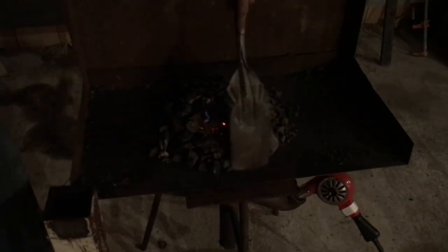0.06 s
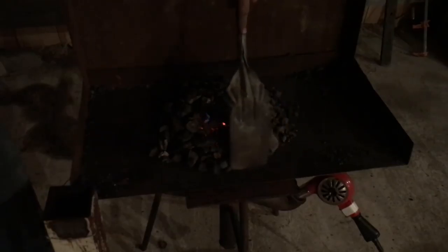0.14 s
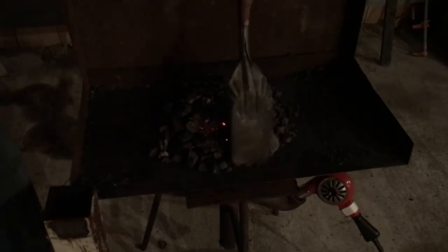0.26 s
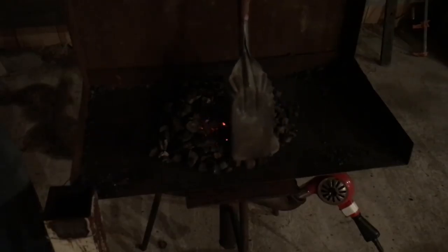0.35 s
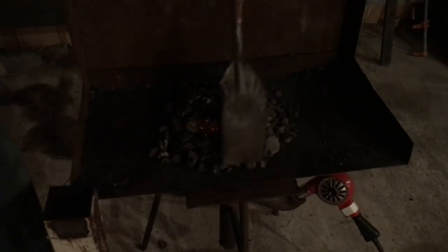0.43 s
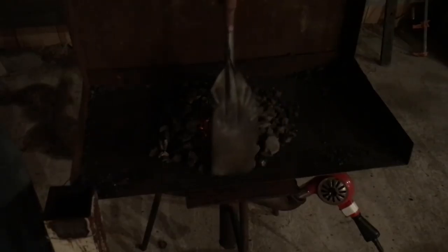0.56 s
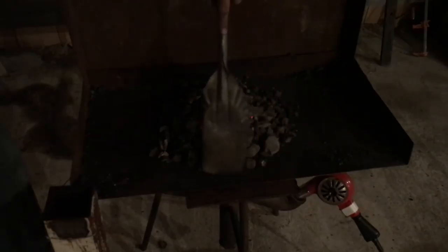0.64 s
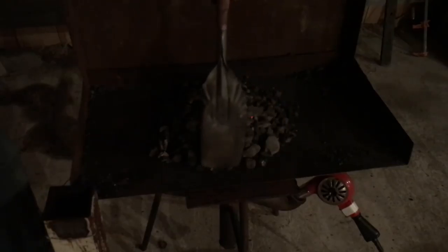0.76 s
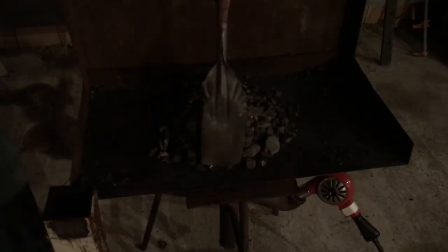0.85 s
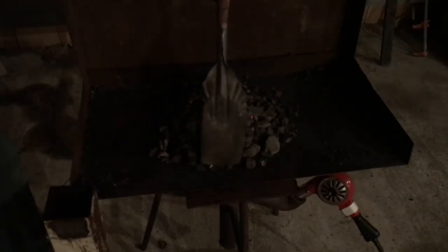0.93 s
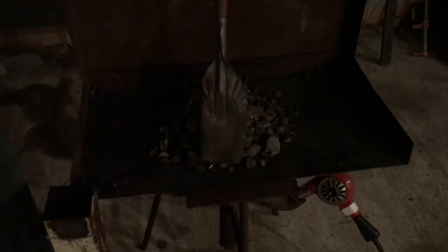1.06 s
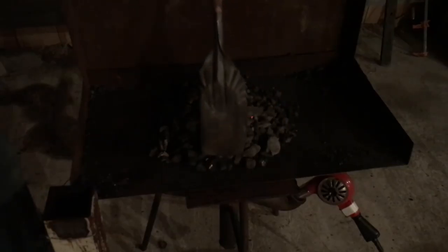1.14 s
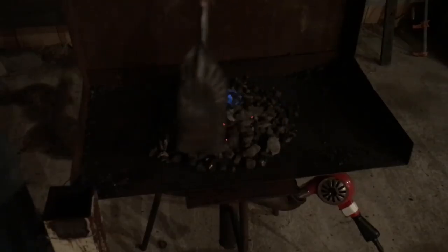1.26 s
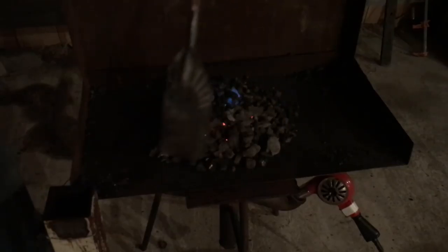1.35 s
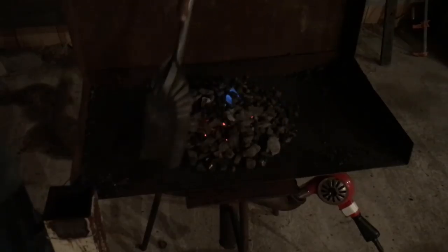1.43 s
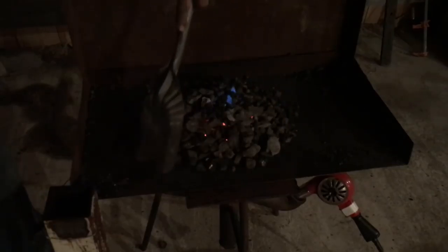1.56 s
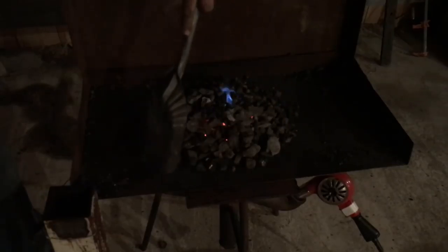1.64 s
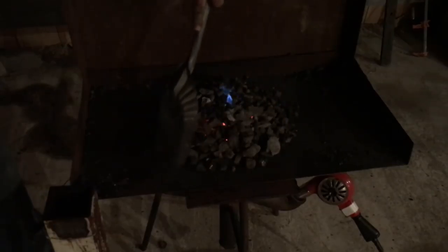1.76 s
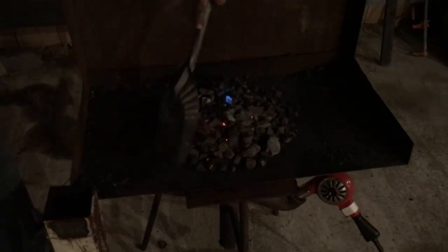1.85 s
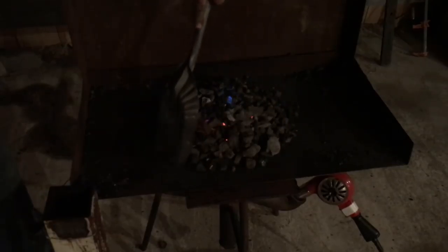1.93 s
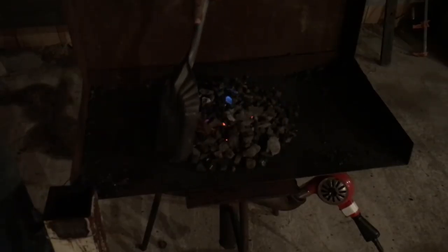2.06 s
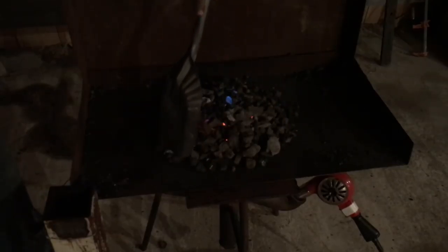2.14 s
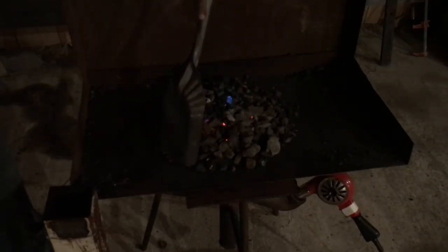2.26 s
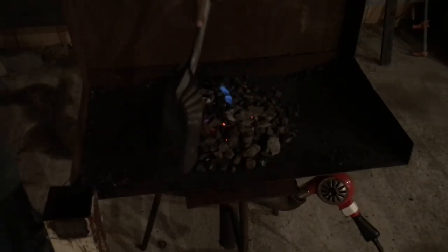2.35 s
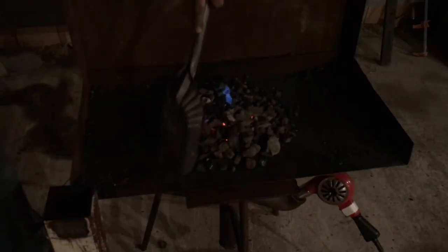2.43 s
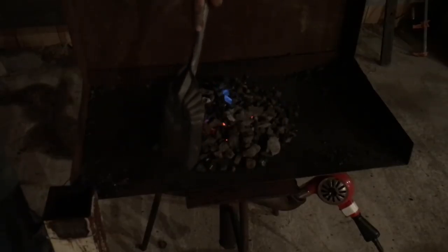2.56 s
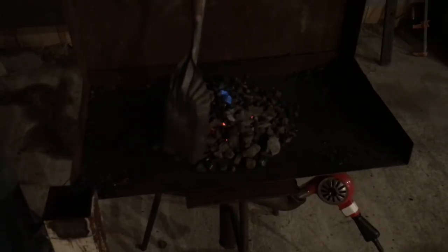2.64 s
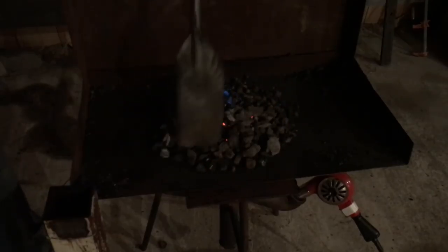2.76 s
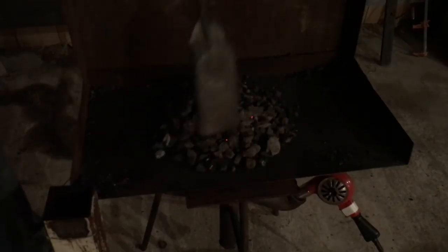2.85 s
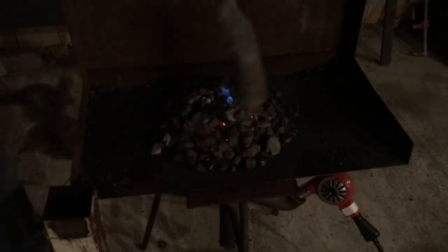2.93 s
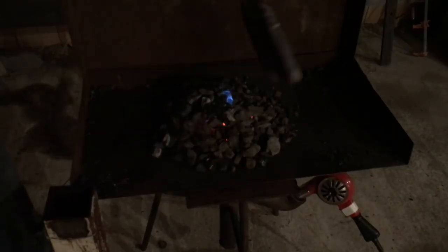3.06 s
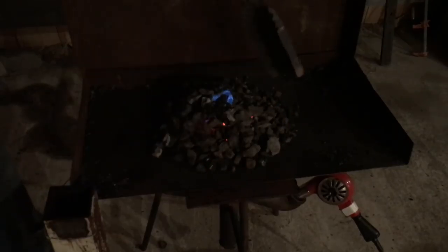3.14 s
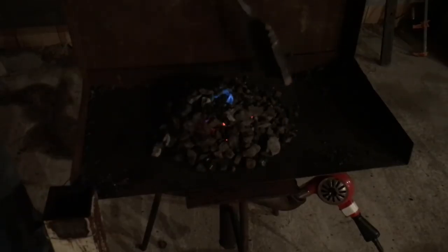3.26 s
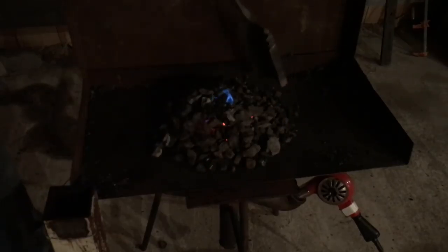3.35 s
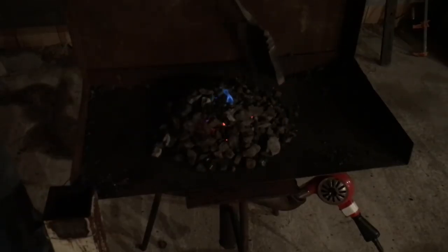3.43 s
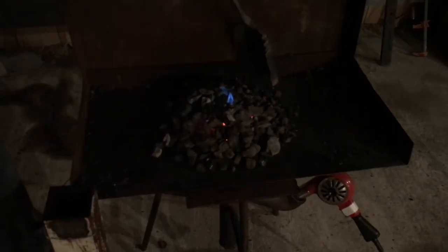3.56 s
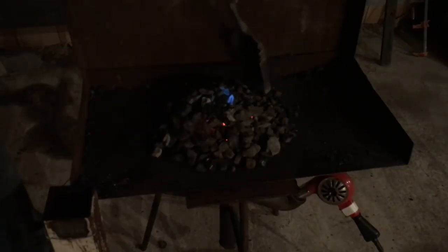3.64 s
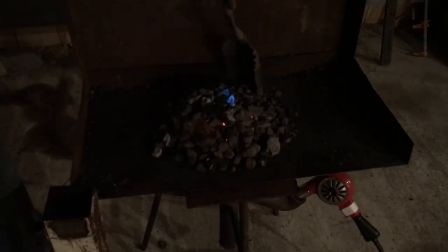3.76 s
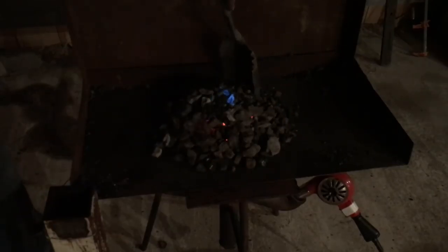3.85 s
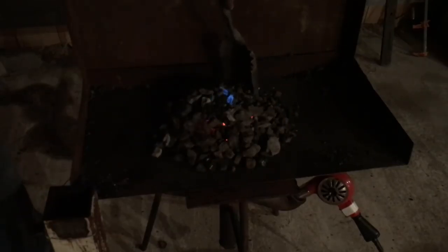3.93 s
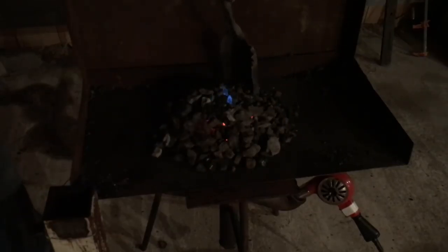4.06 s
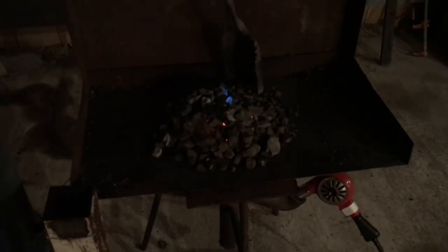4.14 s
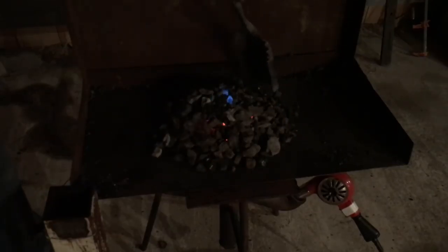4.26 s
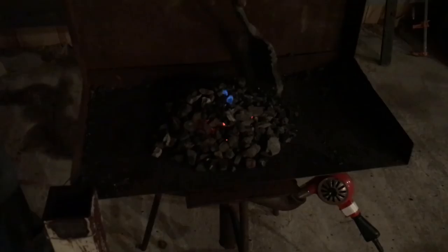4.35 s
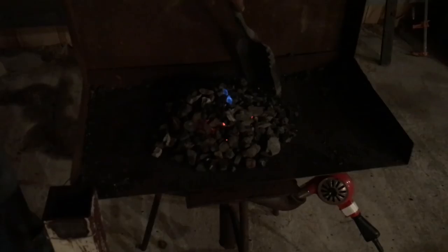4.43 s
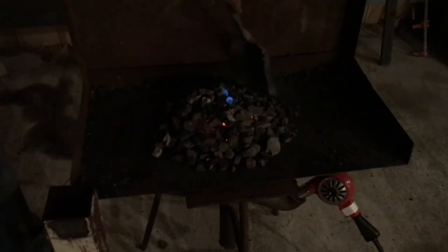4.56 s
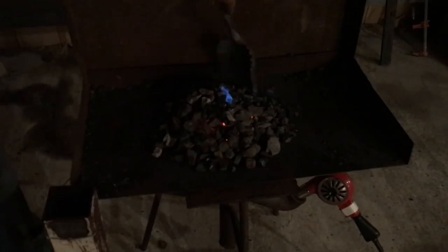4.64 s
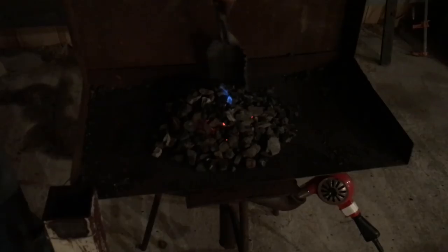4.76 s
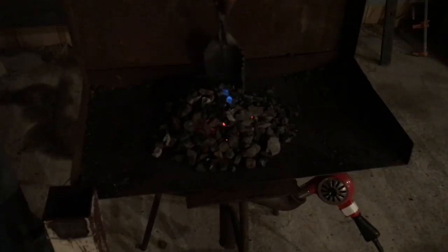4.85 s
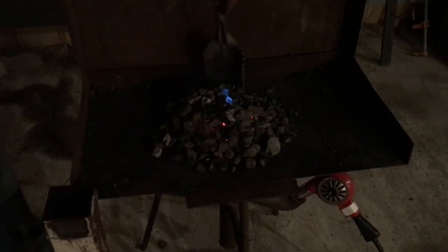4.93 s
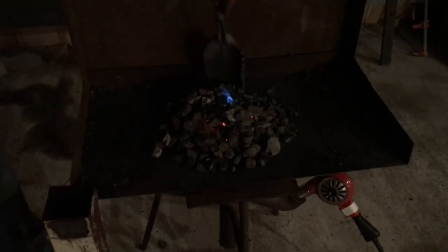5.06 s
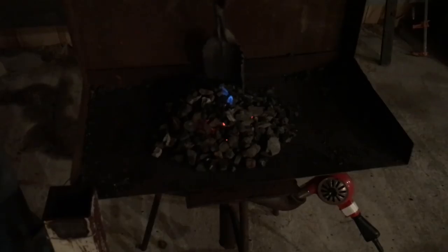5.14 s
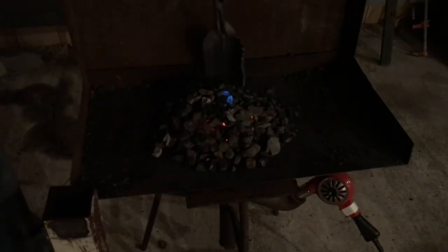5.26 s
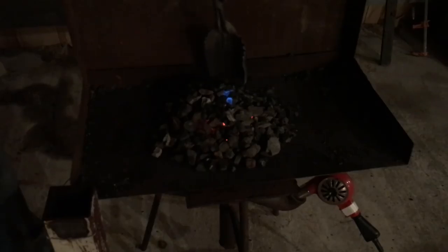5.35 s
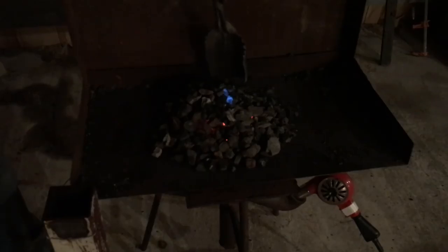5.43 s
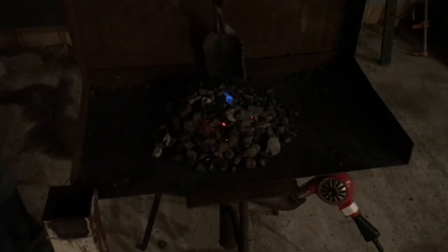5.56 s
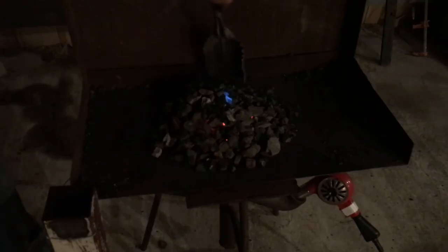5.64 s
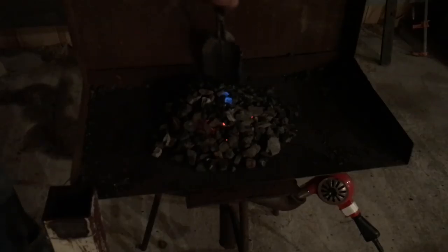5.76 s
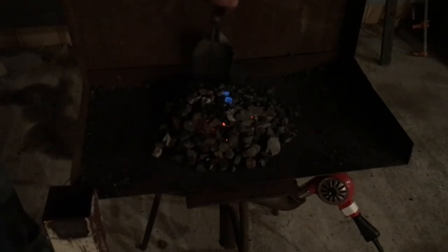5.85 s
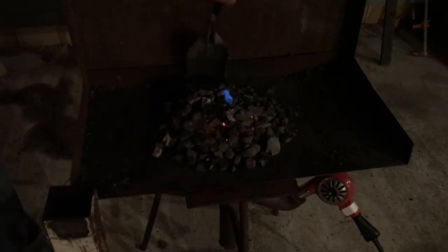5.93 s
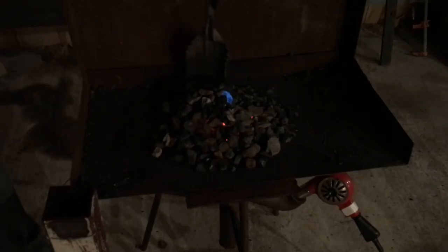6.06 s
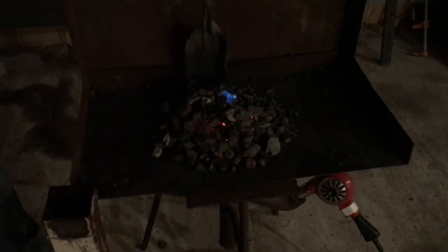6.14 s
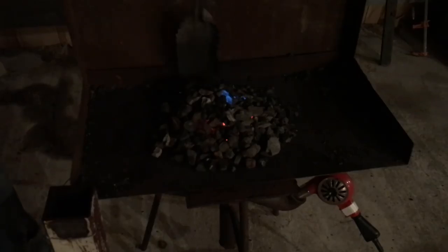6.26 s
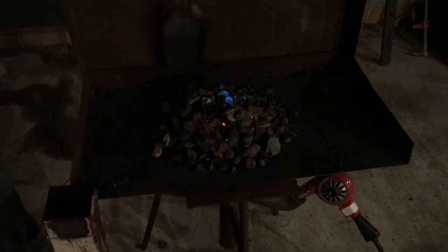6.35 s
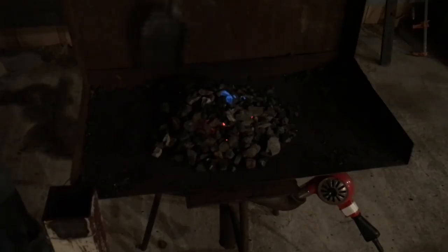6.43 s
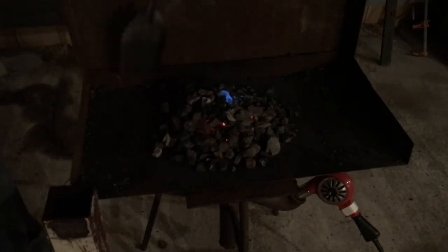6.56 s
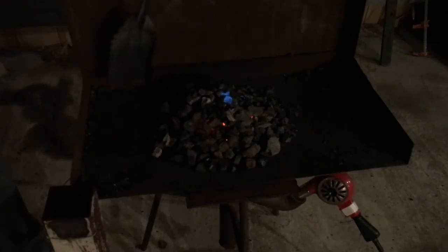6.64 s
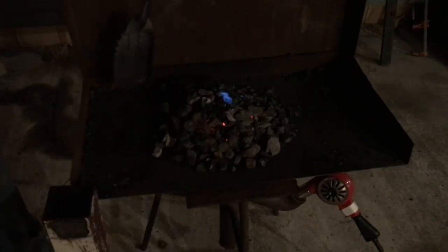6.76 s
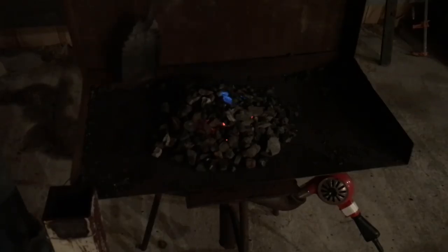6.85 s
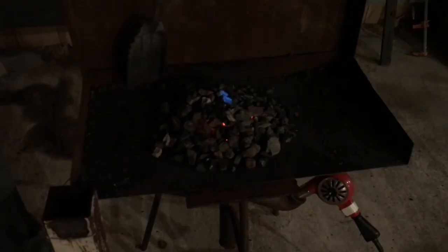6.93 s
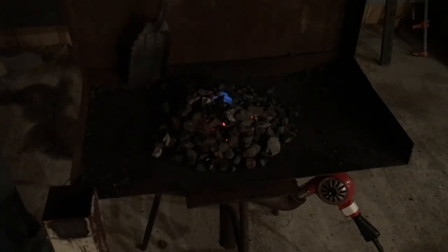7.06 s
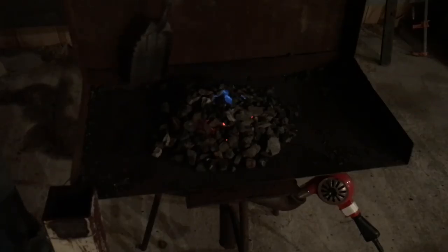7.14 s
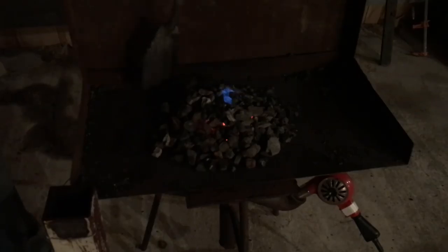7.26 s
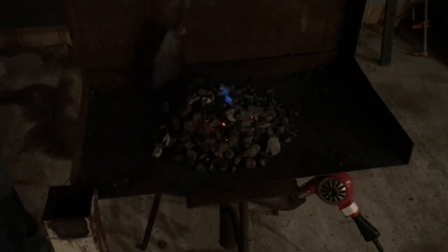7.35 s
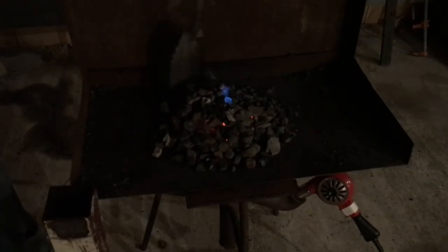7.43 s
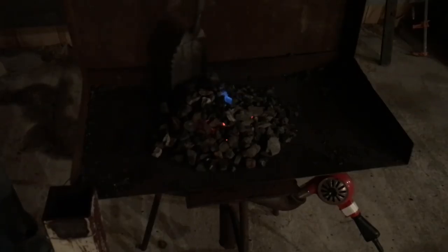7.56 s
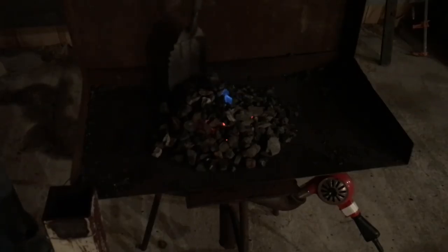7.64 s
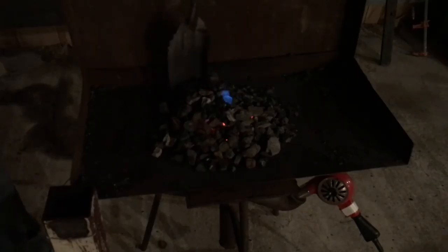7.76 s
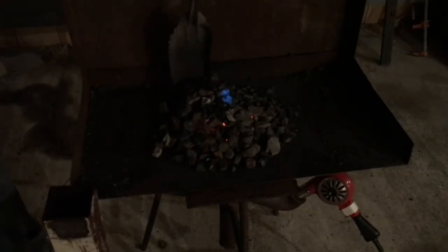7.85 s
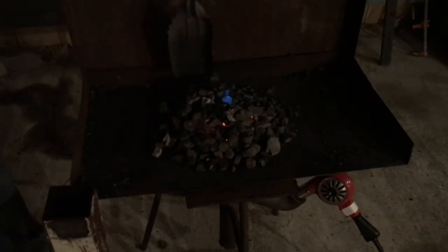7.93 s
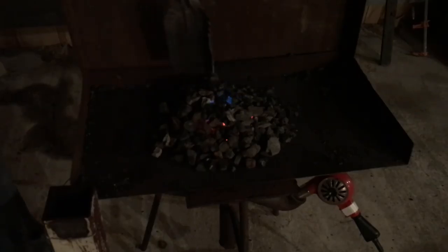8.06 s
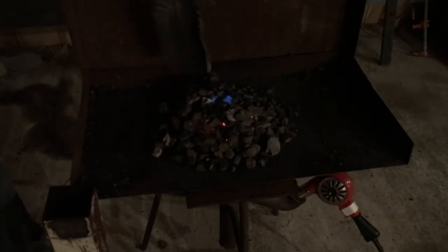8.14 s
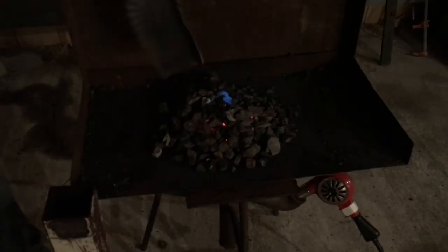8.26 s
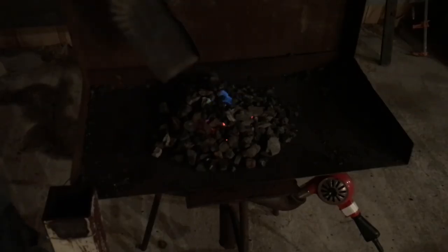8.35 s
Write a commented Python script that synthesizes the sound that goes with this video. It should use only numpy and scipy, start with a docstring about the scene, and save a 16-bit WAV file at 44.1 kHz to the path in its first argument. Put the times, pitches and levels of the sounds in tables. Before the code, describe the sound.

A small steel shovel scrapes and jabs gritty coal into a heap on a sheet-metal forge pan, with clanks, tumbling lumps and sharp fire snaps.

```python
"""Shovelling coal at the forge

A small steel shovel, close to the microphone, pushes coal into a heap on the forge's sheet-steel pan.
Strokes and blows crush random grit that drives the modes of blade, pan and stand; the free blade also rings.
Lumps tumble and coal snaps as short noise bursts, and butts against the pan give low thumps.
The workshop adds a faint low rumble of filtered noise and a short echo of dense reflections."""
import sys
import numpy as np
from scipy import signal
from scipy.io import wavfile
from scipy.ndimage import uniform_filter1d

SR = 44100
rng = np.random.default_rng(int(sys.argv[2]) if len(sys.argv) > 2 else 0)


def to_wav(sig):
    """Store sig (one row per channel, or 1-D mono) as 16-bit WAV at the path in sys.argv[1].

    Samples outside -1..1 are clipped; the rate is SR.
    """
    pcm = np.clip(np.atleast_2d(sig), -1, 1) * 32767
    pcm = np.round(pcm).astype(np.int16)
    wavfile.write(sys.argv[1], SR, pcm.T)  # frames by channels


N = 370440
TIME = np.arange(N) / SR

# The blade lands or jams. Each row: start in seconds, then levels before trim of clash in dB,
# sizzle in dB and pan boom in dB, and decay time constant in seconds.
BLADE_BLOWS = [(0, -26, -43, -30.5, 0.012), (0.569, -20.5, -27, -25.5, 0.016),
               (0.735, -25, -19, -36, 0.016), (0.751, -26, -20, -27.5, 0.0045),
               (0.852, -38, -42, -41, 0.0055), (1.675, -43.5, -47, -41, 0.039),
               (1.69, -26.5, -31.5, -26.5, 0.013), (1.819, -27, -21.5, -41, 0.015),
               (2.508, -19.5, -36, -23.5, 0.0094), (3.6, -36.5, -74, -34.5, 0.021),
               (3.639, -29, -26, -28, 0.028), (3.732, -26.5, -28.5, -31.5, 0.029),
               (4.488, -25, -17.5, -21, 0.011), (4.857, -14.5, -41, -39, 0.0017),
               (5.572, -35, -48, -40.5, 0.0059), (5.702, -47.5, -19.5, -26.5, 0.006),
               (6.248, -26, -42, -42, 0.0053), (6.941, -21.5, -54, -23, 0.018),
               (6.969, -30, -26, -26.5, 0.01), (7.48, -28, -22, -43.5, 0.011),
               (7.513, -19, -19, -40.5, 0.014)]
# Modes of the free blade, twisting and bending by turns.
# Each row: frequency in Hz, relative level in dB, undamped t60 in seconds.
BLADE_MODES = [(1003, -5, .3), (1076, 1, .8), (1205, -6, .17), (1480, -8, .13), (1640, -3, .38),
               (1946, -11, .55), (2197, -4, .3), (2975, -5, .13), (3230, -10, .14), (3390, -4, .18),
               (3975, -6.5, .38), (4540, -12, .06), (5450, -12, .2), (6500, -14, .14), (7720, -18, .12),
               (9620, -22, .25)]
# Spectrum of a coal snap. Each row: frequency in Hz, relative level in dB per Hz.
SNAP_SPECTRUM = [(200, -20.5), (1500, -12), (4000, -6), (7000, 0), (12000, 3), (16000, -2)]
# Spectrum of a knocking lump. Each row: frequency in Hz, relative level in dB per Hz.
KNOCK_SPECTRUM = [(80, -24.5), (450, -8), (770, 0), (1200, -4.5), (2700, -5.5), (5000, -16.5),
                  (16000, -24.5)]


def amp(db):
    """Turns dB into an amplitude factor."""
    return 10 ** (np.asarray(db) / 20)


def unit(x):
    """Scales to an energy of one."""
    return x / np.sqrt(np.sum(x ** 2) + 1e-20)


def read(points, hz):
    """Reads a table on a log-frequency axis."""
    f, value = np.transpose(points)
    return np.interp(np.log(hz + 1), np.log(f + 1), value)


def along(rows):
    """Joins the rows of a curve by straight lines, one signal a column."""
    s, *columns = np.transpose(rows)
    return [np.interp(TIME, s, column) for column in columns]


def add(mix, s, sound):
    """Mixes a sound in at time s."""
    part = mix[max(round(s * SR), 0):][:len(sound)]
    part += sound[:len(part)]


def through(x, response):
    """Sends a force or sound through an impulse response."""
    return signal.oaconvolve(x, response)[:N]


def colour(points, size=2048):
    """Causal minimum-phase impulse response with the given spectrum and an energy of one."""
    log_gain = np.log(amp(read(points, abs(np.fft.fftfreq(size, 1 / SR)))))
    spectrum = np.exp(np.conj(signal.hilbert(log_gain)))
    return unit(np.fft.ifft(spectrum).real)


def body(modes, damping_db_s=0):
    """Impulse response of a set of dying modes; contact adds damping."""
    t = TIME[:SR]
    response = np.zeros(SR)
    for k, (hz, db, t60) in enumerate(modes):
        decay = amp(-t * (60 / t60 + damping_db_s))
        response += amp(db) * unit(decay * np.cos(2 * np.pi * (hz * t + k / 4)))
    return unit(response)


def bursts(rows, length, spectrum):
    """Each row (start in s, peak in dB) is one fracture or impact: coloured noise dying away in length s."""
    out, t, response = np.zeros(N), TIME[:2048], colour(spectrum)
    for s, db in rows:
        dying_noise = rng.standard_normal(len(t)) * np.exp(-t / length)
        burst = signal.fftconvolve(dying_noise, response)
        add(out, s, amp(db) * burst / abs(burst).max())
    return out


def workshop_air():
    """The faint low rumble of the workshop: steady noise with a fixed spectrum."""
    # Each row: frequency in Hz, relative level in dB per Hz.
    air_spectrum = [(20, -22), (58, 14.5), (80, -3), (170, 6), (1000, -24), (16000, -36.5)]
    return amp(-61.5) * through(rng.standard_normal(N), colour(air_spectrum))


def room(x):
    """A tail of dense reflections that builds up quickly, each band dying at its own speed."""
    # Reverberation of the workshop. Each row: frequency in Hz, t60 in seconds.
    room_t60 = [(200, 1.0), (800, 0.7), (5000, 0.31), (15000, 0.1)]
    taps = rng.standard_normal(SR) * (1 - np.exp(-TIME[:SR] / 0.0054))
    hz, t, bands = signal.stft(taps, SR, nperseg=256)
    decay = amp(-60 * t / read(room_t60, hz)[:, None])
    tail = signal.istft(bands * decay, SR, nperseg=256)[1]
    return through(x, unit(tail))


def crackle(per_s, db):
    """Small random ticks of the fire and of settling crumbs; a few stand out by up to 20 dB."""
    draws = rng.random((int(per_s * N / SR), 2))
    ticks = [(u * N / SR, db + 20 * v ** 4) for u, v in draws]
    return bursts(ticks, 0.00022, SNAP_SPECTRUM)


def coal_snaps():
    """Coal in the fire fractures with sharp snaps: noise bursts under a millisecond long."""
    # Each row: start in seconds, peak in dB.
    snap_times = [(1.257, -17.5), (1.4227, -13.5), (1.6298, -28), (2.2975, -35), (2.4112, -8),
                  (3.1397, -20), (3.275, -27), (3.4169, -4), (3.5756, -4.5), (3.8355, -13), (3.979, -12.5),
                  (4.1283, -20.5), (4.2003, -20.5), (4.2444, -22.5), (5.7026, -6), (5.7588, -18),
                  (5.7808, -12)]
    return bursts(snap_times, .0008, SNAP_SPECTRUM)


def lump_knocks():
    """Single lumps tumble and knock, each a duller burst of several milliseconds."""
    # Each row: start in seconds, peak in dB.
    knock_times = [(0.373, -23), (0.422, -27.5), (0.536, -29), (1.102, -29.5), (1.229, -38), (2.831, -23),
                   (2.881, -19), (2.907, -27), (2.962, -32), (2.986, -32), (3.242, -36), (4.423, -34),
                   (5.494, -28.5), (6.334, -35), (8.146, -19.5), (8.225, -21)]
    return bursts(knock_times, .008, KNOCK_SPECTRUM)


def tumble(push_db, per_s, db, most_db):
    """Small lumps roll ahead of the blade, harder when it pushes harder."""
    when, size = rng.random((int(per_s * N / SR), 2)).T
    push_then_db = push_db[(when * N).astype(int)]
    peaks_db = np.minimum(push_then_db + db, most_db) - 10 * size
    return bursts(zip(when * N / SR, peaks_db), 0.0023, KNOCK_SPECTRUM)


def thumps():
    """Loaded with coal, the pan answers a butt of the blade with a few low cycles that swell and die."""
    # Each row: start in seconds, level in dB, pitch in Hz.
    butts = [(.003, -30, 160), (.571, -25, 225), (4.489, -18, 310), (5.705, -24, 330)]
    out, t = np.zeros(N), TIME[:SR]
    thump_s = .010  # time constant of the decay
    for s, db, hz in butts:
        swell = np.sqrt(t / thump_s) * np.exp(1 - t / thump_s)
        add(out, s, amp(db) * swell * np.sin(2 * np.pi * hz * t))
    return out


def singing():
    """Where only its edge touches, the blade rings freely; contact near a corner brings out twisting modes."""
    # The free blade is tapped or chatters. Each row: start in seconds, level in dB before the mode levels,
    # rise in seconds, brightness in dB per octave, twist in dB, extra damping by contact in dB/s.
    taps = [(2.08, -40, .02, -12, 7, 30), (2.152, -22.5, .018, -4, -16, 35), (2.595, -23, .012, -8, 0, 200),
            (4.137, -49, .002, 6, 3, 70), (5.28, -37, .002, -4, 2, 50), (5.572, -35, .004, -7, 2, 80),
            (6.248, -35, .0005, 0, 5, 0), (6.943, -18.5, .004, -8, 2, 350), (7.511, -27, .001, 8, -14, 600),
            (7.79, -44, .004, 3, 1, 90)]
    out, t = np.zeros(N), TIME[:SR]
    for s, ring_db, rise, slope_db, twist_db, damping in taps:
        ring = np.zeros(SR)
        for k, (hz, db, t60) in enumerate(BLADE_MODES):
            twisting = k % 2 == 0
            mode_db = db + slope_db * np.log2(hz / 1000) + twist_db * twisting
            ring += amp(mode_db - 60 * t / t60) * np.sin(2 * np.pi * (hz * t + rng.random()))
        add(out, s, amp(ring_db - damping * t) * ring * (1 - np.exp(-t / rise)))
    return out


def chinks(force):
    """Lumps of many sizes snag on the blade and spring free, each with a short ring at its own pitch."""
    per_s, t60 = 240, .016  # chinks per second, ring time in s
    low, high = 1700, 13000  # range of pitch in Hz
    out, t = np.zeros(N), TIME[:2048]
    when, pitch, size = rng.random((int(per_s * N / SR), 3)).T
    pitches_hz = low * (high / low) ** pitch
    gains = unit(size ** 2) * np.sqrt(N)
    for at, hz, gain in zip((when * N).astype(int), pitches_hz, gains):
        ring = unit(amp(-60 * t / t60) * np.sin(2 * np.pi * hz * t))
        add(out, at / SR, gain * force[at] * ring)
    return out


def grit(per_s, spread_db, dust):
    """Force of crushed grains: clicks of uneven size over a bed of fine dust, rms one."""
    struck = rng.random(N) < per_s / SR
    sizes = amp(spread_db * np.minimum(rng.exponential(1, N), 4))
    clicks = struck * rng.choice([-1, 1], N) * sizes
    return unit(unit(clicks) + dust * unit(rng.standard_normal(N))) * np.sqrt(N)


def wander(x, depth_db, order, size):
    """As the point of contact moves, resonances swell and fade (over `order` frames and `size` bins)."""
    z = signal.stft(x, nperseg=512, noverlap=384)[2]
    patches = uniform_filter1d(rng.standard_normal(z.shape), size, 0)
    patches = uniform_filter1d(patches, order, 1)
    gain = amp(depth_db * patches / patches.std())
    y = signal.istft(z * gain, nperseg=512, noverlap=384)[1][:N]
    return unit(y) * np.sqrt(N)


def judder(depth_db, size):
    """Gain of the blade catching and slipping: noise smoothed twice over `size` samples."""
    smooth = uniform_filter1d(uniform_filter1d(rng.standard_normal(N), size), size)
    return amp(depth_db * np.sqrt(N) * unit(smooth))


def effort():
    """Scrape and pan boom in dB before trim: each push builds and lets go; disturbed coal slides to rest."""
    # The blade goes through the coal in full strokes and small nudges. Each row: time of hardest push in
    # seconds, scrape in dB before trim, build-up in seconds, let-go in seconds,
    # pan boom in dB re scrape before trim.
    pushes = [(.08, -26.5, 0.097, 0.11, -6.5), (.285, -37.5, 0.07, 0.14, -8),
              (.89, -27.5, 0.15, 0.04, -10.5), (1.3, -57, 0.24, 0.77, -3), (1.855, -21, 0.11, 0.03, -9),
              (2.05, -38.5, 0.044, 0.12, -6), (2.189, -36.5, 0.14, 0.031, -1.5),
              (2.614, -24, 0.1, 0.058, -14), (3.769, -28, 0.1, 0.26, -4), (4.15, -44.5, 0.85, 0.18, -13),
              (4.632, -21.5, 0.053, 0.2, -4), (4.863, -25, 0.13, 0.077, -6), (5.24, -45, 0.41, 0.49, -7.5),
              (5.603, -34, 0.017, 0.21, -2), (5.685, -31.5, 0.06, 0.031, 2.5), (5.87, -24, 0.1, 0.12, -4.5),
              (5.931, -23, 0.11, 0.14, -6), (6.231, -40, 0.74, 0.044, -15),
              (7.091, -41.5, 0.057, 0.085, -7), (7.2, -42.5, 0.033, 0.033, 3.5),
              (7.325, -29, 0.07, 0.36, -6.5), (7.495, -22, 0.23, 0.05, -5),
              (7.796, -38.5, 0.21, 0.094, -11)]
    stroke_range_db = 21.5  # gained over the build-up and lost over the let-go
    settle_db, settle_db_per_s = -19, 52.5  # coal keeps sliding after a push
    settle_boom_db, rumble_db_per_s = -15, 30.5  # the pan's rumble outlasts the sliding
    jolt_db, jolt_db_per_s = -21.5, 83  # coal shaken loose by a blow, re its clash
    lift_s = 0.037  # time for the blade to meet the coal before a push and to leave it afterwards
    rest_db = -74  # faint rubbing of the blade at rest
    t = TIME[::64]

    def swell(s, db, build, fall_db_s):
        """Power that rises to time s and falls after it, both straight in dB."""
        below_db = np.maximum((s - t) * stroke_range_db / build, (t - s) * fall_db_s)
        return amp(db - below_db) ** 2

    scrape, boom = np.full((2, len(t)), amp(rest_db) ** 2)
    for s, db, build, let_go, boom_db in pushes:
        touching = np.clip(1 + np.minimum(t - s + build, s + let_go - t) / lift_s, 0, 1)
        push = swell(s, db, build, stroke_range_db / let_go) * touching ** 2
        scrape += push + swell(s, db + settle_db, build, settle_db_per_s)
        rumble = swell(s, db + settle_boom_db, build, rumble_db_per_s)
        boom += amp(boom_db) ** 2 * (push + rumble)
    for s, clash_db, *_ in BLADE_BLOWS:
        sliding = (t > s) * amp(clash_db + jolt_db - jolt_db_per_s * abs(t - s)) ** 2
        scrape += sliding
        boom += sliding
    return [np.interp(TIME, t, 10 * np.log10(power)) for power in (scrape, boom)]


def shovel(scrape_db, boom_db):
    """Strokes and blows crush grit between blade and pan and shake both."""
    # Slow drift of the balance as the shovel works round the pan. Each row: time in seconds,
    # sizzle of fine grit in dB re scrape and thud of the stand in dB re boom, both before trim.
    place = [(.3, -7.5, -10.5), (1.3, -0.5, -16), (2.5, -2, -8), (3.6, 6.5, -18), (4.7, 2, -39.5),
             (6, -0.5, -20.5), (7.2, -1.5, -26.5)]
    # Modes of the pan. Each row: frequency in Hz, relative level in dB, t60 in seconds.
    pan_modes = [(160, -13, .25), (232, -4, .25), (280, -5, .2), (326, -4, .2), (389, -3, .25),
                 (724, -4, .25), (237, -9, 1.5), (624, -14, 1.8)]
    # The forge rocking on its legs. Each row: frequency in Hz, relative level in dB, t60 in seconds.
    stand_modes = [(74, -12, .5), (95.5, -9, .85)]
    # Spectra of crunch, sizzle and boom. Each row: frequency in Hz, relative level in dB per Hz.
    crunch_spectrum = [(100, -38), (400, -7.5), (1050, 6.5), (1350, 1), (1700, 4), (2500, -1.5),
                       (3400, -0.5), (4800, -8.5), (8000, -11), (16000, -10.5)]
    sizzle_spectrum = [(500, -24), (2500, 0.5), (4500, 0), (7500, 2.5), (14000, -2), (16000, -14)]
    boom_spectrum = [(40, -33.5), (130, -15.5), (220, 1), (400, 0), (600, -6.5), (1400, -43.5)]

    sizzle_db, thud_db = along(place)
    slips = judder(1.8, size=170)
    crunch = slips * amp(scrape_db - 3.5)
    sizzle = slips * amp(scrape_db + sizzle_db - 2)
    boom = slips * amp(boom_db - 5.0)
    t = TIME[:SR // 3]
    for start, *levels_db, length in BLADE_BLOWS:
        blow = np.exp(-t / length) * (1 - np.exp(-t / 0.00078))
        for drive, db in zip((crunch, sizzle, boom), levels_db):
            add(drive, start, amp(db + 2.5) * blow)

    coarse = grit(per_s=2500, spread_db=2.6, dust=.5)
    fine = grit(per_s=2200, spread_db=2.8, dust=.35)
    coarse = wander(coarse, 3.5, order=9, size=3)
    fine = wander(fine, 4.5, order=12, size=3)

    blade = body(BLADE_MODES, damping_db_s=800)  # pressed into the coal, it rings only briefly
    crushing = amp(1.5) * through(crunch * coarse, colour(crunch_spectrum))
    steel = crushing + amp(-2.0) * through(crunch * fine, blade)
    chips = through(sizzle * fine, colour(sizzle_spectrum)) + amp(-5.5) * chinks(crunch)
    shaking = boom * grit(per_s=2500, spread_db=2.6, dust=.5)
    pan = through(boom * coarse, colour(boom_spectrum))
    pan += amp(-3.5) * through(shaking, body(pan_modes))
    stand = through(amp(thud_db + 3.0) * shaking, body(stand_modes))
    return steel + chips + pan + stand


def scene():
    """Shovel, lumps and fire in the workshop, over its faint rumble."""
    air = workshop_air()
    fire = coal_snaps() + crackle(per_s=32, db=-54.5)
    scrape_db, boom_db = effort()
    lumps = lump_knocks() + tumble(scrape_db, per_s=30, db=11.7, most_db=-23.0)
    steel = shovel(scrape_db, boom_db) + singing() + thumps()
    echo = room(amp(-13.0) * steel + amp(-8) * lumps + amp(-18) * fire)
    return (steel + lumps + fire + air + echo)[None]


def record(dry):
    """The band limit of the recorder: a steep low-pass at 16.1 kHz."""
    low_pass = signal.firwin(255, 16100, window=("kaiser", 8), fs=SR)
    return signal.oaconvolve(dry, low_pass[None], "same")


dry = scene()
out = record(dry)
to_wav(out)
```